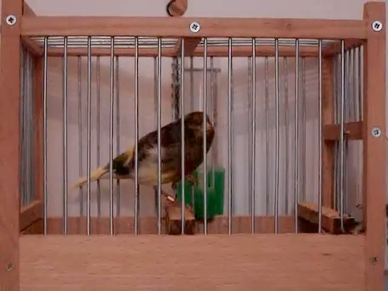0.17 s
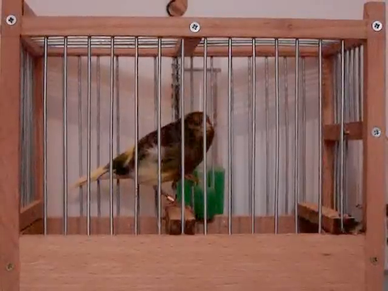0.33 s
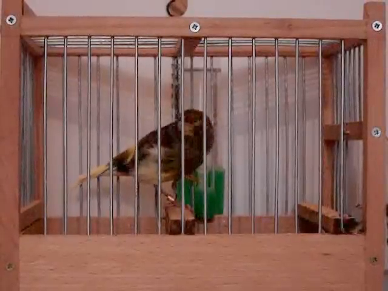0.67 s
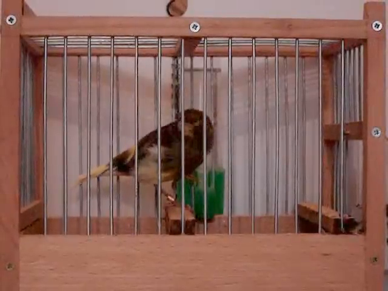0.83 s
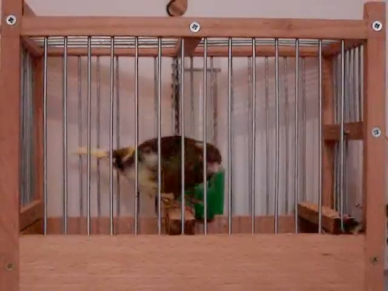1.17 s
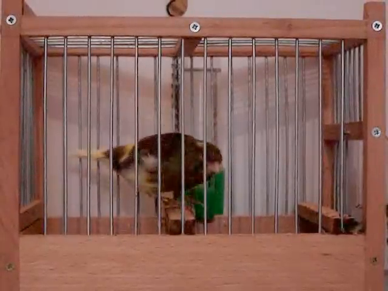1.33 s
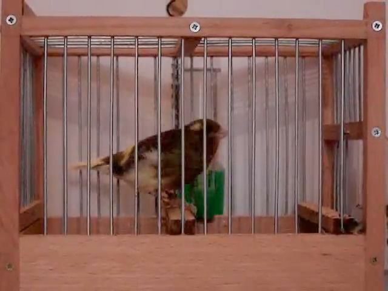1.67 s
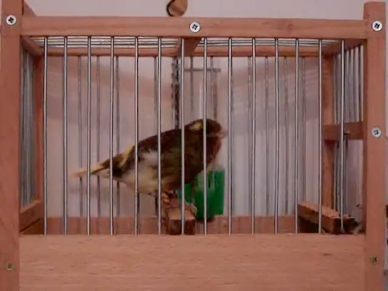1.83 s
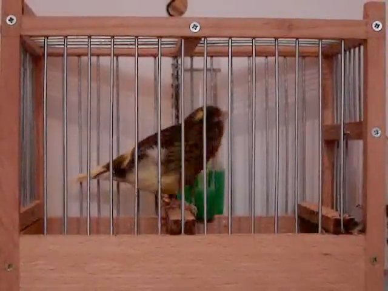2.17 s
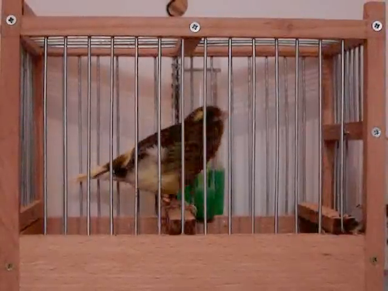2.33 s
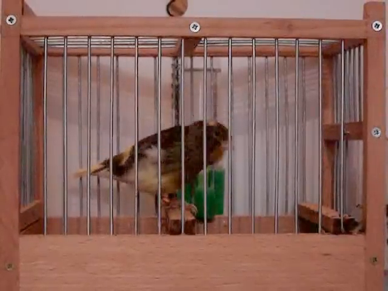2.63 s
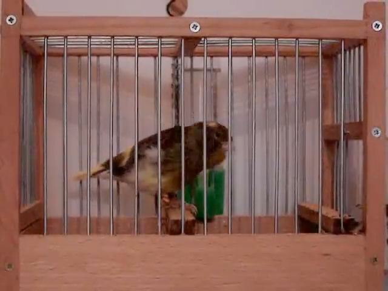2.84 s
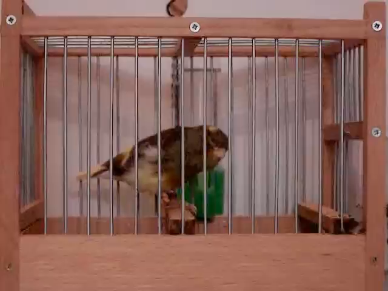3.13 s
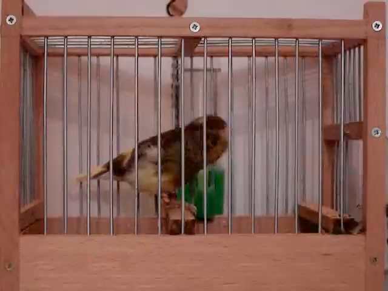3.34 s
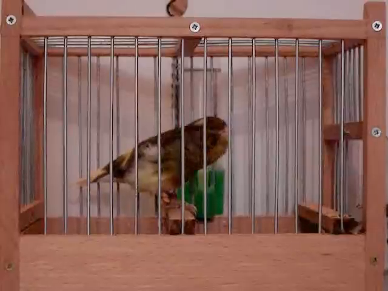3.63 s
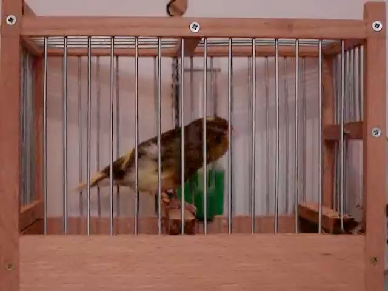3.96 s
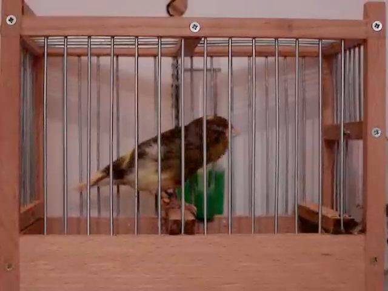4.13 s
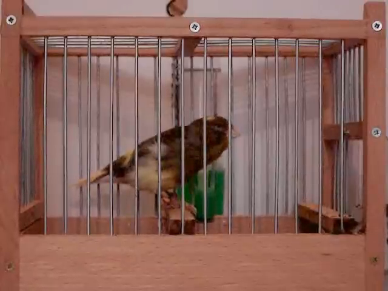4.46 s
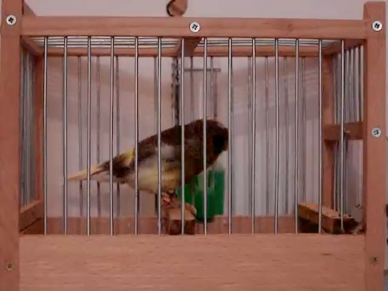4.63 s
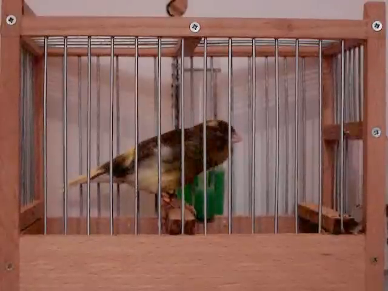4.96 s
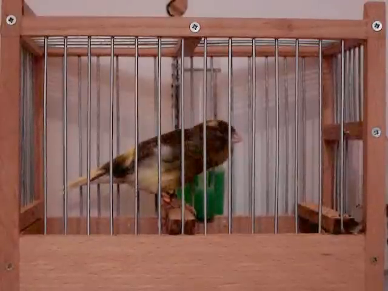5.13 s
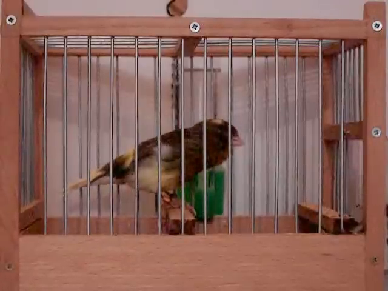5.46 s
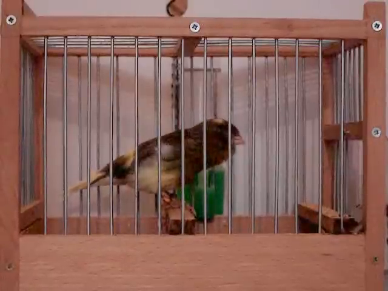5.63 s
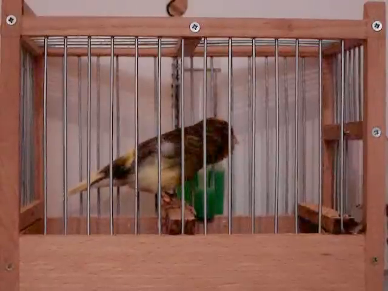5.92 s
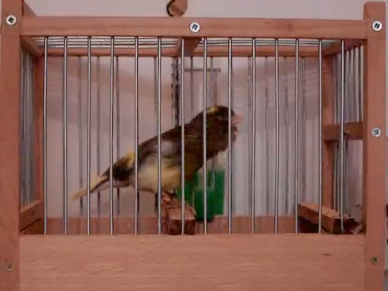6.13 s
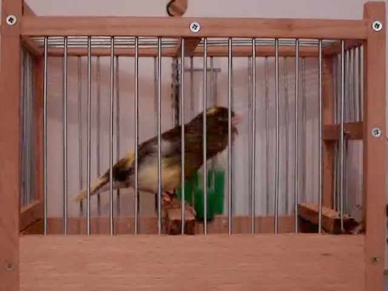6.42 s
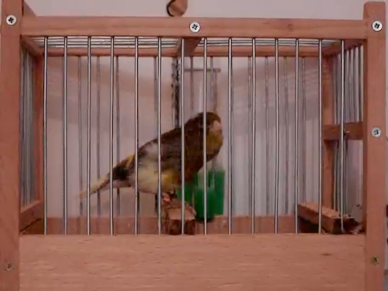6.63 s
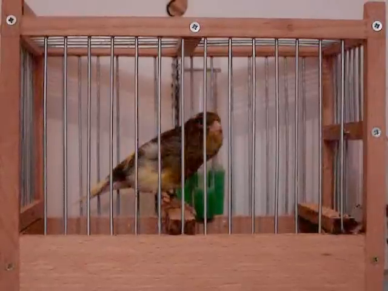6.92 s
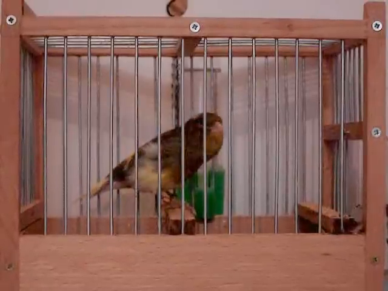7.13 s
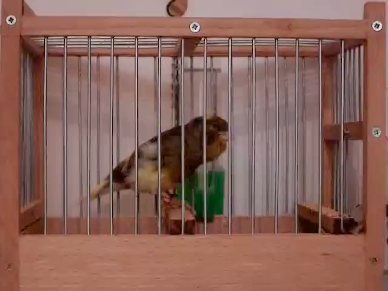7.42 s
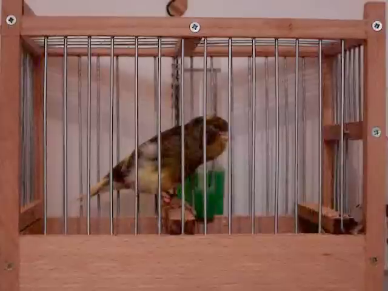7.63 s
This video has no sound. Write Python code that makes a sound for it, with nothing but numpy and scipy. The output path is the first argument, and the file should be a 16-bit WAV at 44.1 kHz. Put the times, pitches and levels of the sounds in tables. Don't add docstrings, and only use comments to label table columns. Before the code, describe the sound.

A single canary sings close to a small microphone in a hard, lively room with faint hiss and low rumble. After a quiet second come a low cluck, dropping notes and soft held whistles, with another bird buzzing faintly. Six sharp chips follow, then a fast ticking trill that rises, then regular double chips to the end.

```python
import sys
import numpy as np
from scipy import signal
from scipy.fft import rfft, irfft
from scipy.io import wavfile
from scipy.ndimage import uniform_filter1d

SR = 44100
rng = np.random.default_rng(int(sys.argv[2]) if len(sys.argv) > 2 else 0)


def generate_wav(signal):
    frames = np.transpose(np.atleast_2d(signal))
    scaled = np.clip(frames, -1, 1) * 32767
    pcm = np.round(scaled).astype(np.int16)
    wavfile.write(sys.argv[1], SR, pcm)


def boost_factor(decibels):
    exponent = np.asarray(decibels, float) / 20
    return 10 ** exponent


N = 343539
EDGE_HZ = 10280


def evened(x):
    return x / np.sqrt(np.mean(x ** 2) + 1e-20)


def read(points, hz):
    f, value = np.transpose(points)
    return np.interp(np.log(hz + 1), np.log(f + 1), value)


def add(mix, s, sound):
    part = mix[round(s * SR):][:len(sound)]
    part += sound[:len(part)]


def band(x, lo_hz, hi_hz):
    return signal.sosfilt(signal.butter(2, [lo_hz, hi_hz], "band", fs=SR, output="sos"), x)


def coloured(count, points):
    spectrum = rfft(rng.standard_normal(count))
    return irfft(spectrum * boost_factor(read(points, np.fft.rfftfreq(count, 1 / SR))), count)


def wander(count, s):
    size = int(s * SR)
    return evened(uniform_filter1d(uniform_filter1d(rng.standard_normal(count), size), size))


def stages(shape, length_s):
    share, *columns = np.transpose(shape)
    u = np.arange(0, 1, 1 / (length_s * SR))
    return [np.interp(u, share, column) for column in columns]


def narrowed(shape, sweep):
    return [(u, 1 + sweep * (factor - 1), *levels) for u, factor, *levels in shape]


# pitch_hz, level_db
THROAT = [(800, 10), (2600, 2), (3600, -6), (4400, 2.5), (5200, -3), (6200, -2), (7500, -8.5), (10000, -11)]


def syrinx(hz, level_db, tones_db, lift_db, flicker_db):
    count = len(hz)
    phase = 2 * np.pi * (np.cumsum(hz) / SR + rng.random())
    voice = np.sin(phase)
    for k, db in enumerate(tones_db, 2):
        flicker = flicker_db * wander(count + 800, 0.003)[400:-400]
        tone_db = db + lift_db + read(THROAT, k * hz) + flicker
        voice = voice + boost_factor(tone_db) * np.sin(k * phase) * (k * hz < EDGE_HZ)
    ramp = np.arange(count)
    edge = np.minimum(ramp, ramp[::-1]) / (0.0009 * SR)
    return boost_factor(level_db) * voice * np.clip(edge, 0, 1)


# time_s, overtone_lift_db
BEAK = [(1.4, -1), (2.8, -0.4), (3.3, 5.5), (3.65, 0.5), (4.3, 1.4), (5.0, 6), (5.5, -2.5), (5.8, 2),
        (6.55, 1), (7.03, -3), (7.6, -3.5)]
# pitch_hz, level_db per Hz
BREATH = [(900, -12), (1500, -8), (3000, 5), (4500, -1.5), (6500, -11.5), (9500, -15)]


def notes(rows, shape, tones_db, dip=(0, 0)):
    out = np.zeros(N)
    dip_share, dip_db = dip
    for s, db, hz, length_s in rows:
        factor, shape_db, lift_db = stages(shape, length_s)
        t = np.arange(len(factor)) / SR - dip_share * length_s
        shape_db = shape_db + dip_db * np.exp(-(t / 0.00088) ** 2)
        beak_db = np.interp(s, *np.transpose(BEAK))
        breath_db = db + shape_db + lift_db - 22.5 - 0.4 * beak_db
        rush = evened(coloured(4096, BREATH))[:len(factor)] * boost_factor(breath_db)
        voice = syrinx(hz * factor, db + shape_db, tones_db, lift_db + beak_db, 3.5)
        add(out, s, voice + rush * np.hanning(len(factor)) ** 0.34)
    return out


def held(rows, shape, tones_db):
    out = np.zeros(N)
    for s, db, hz, length_s in rows:
        factor, shape_db, lift_db = stages(shape, length_s)
        hz = hz * factor * (1 + 0.013 * wander(len(factor), 0.0016))
        lift_db = lift_db + 2.5 * wander(len(hz), .012)
        add(out, s, syrinx(hz, db + shape_db, tones_db, lift_db, 2.1))
    return out


# pitch_hz, level_db per Hz
HISS = [(290, -6.5), (357, -7), (386, -11.5), (804, -14.5), (1260, -16.5), (2900, -20), (7860, -21),
        (10500, -32)]
# half_width_hz, level_db
WHINE = (30, -70.5)
# pitch_hz, level_db per Hz
LOW = [(12, -61), (20, -19), (119, -9.5), (185, -2.5), (223, -5), (300, -7.5)]
# time_s, level_db, half_width_s
SWELLS = [(2.1, 0.5, 0.92), (3.1, 8.5, 0.17), (3.65, 2.5, 0.45), (5.2, 5, 0.33), (7.75, 5, 0.33)]


def air():
    t = np.arange(N) / SR
    hz = np.fft.rfftfreq(N, 1 / SR)
    hiss = evened(irfft(rfft(coloured(N, HISS)) * (hz > 300) * (hz < EDGE_HZ), N))
    low = evened(irfft(rfft(coloured(N, LOW)) * (hz <= 300), N))
    width_hz, whine_db = WHINE
    whine = evened(band(rng.standard_normal(N), 7850 - width_hz, 7850 + width_hz))
    swell_db = sum(db * np.exp(-((t - s) / half_s) ** 2) for s, db, half_s in SWELLS)
    return boost_factor(-53) * hiss + boost_factor(whine_db) * whine + boost_factor(-60.5 + swell_db) * low


# start_s, level_db, length_s
RUSTLES = [(.37, -52, .06), (1.345, -56, .05), (2.372, -54, .03)]


def rustles():
    out = np.zeros(N)
    for s, db, length_s in RUSTLES:
        u = np.arange(0, 1, 1 / (length_s * SR))
        brush = evened(band(rng.standard_normal(len(u)), 830, 5100))
        add(out, s, boost_factor(db) * brush * np.sqrt(u) * (1 - u) * 1.8)
    return out


# start_s, level_db, pitch_hz, length_s
CLUCKS = [
    (1.2414, -18.5, 1056, 0.0071),
    (1.355, -30, 1080, 0.0044),
    (1.593, -31, 1003, 0.0072),
]
# length_share, pitch_factor, level_db, overtone_lift_db
CLUCK_SHAPE = [(0, 1.1, 1.5, 4.5), (.4, 1.001, 0, -5), (1, .9, -13, 1)]
SOFT_SHAPE = [(0, .9, -14, 0), (.3, 1, -2, 0), (.75, 1, 0, 0), (1, 1.01, -14, 0)]
CLUCK_TONES_DB = [-20, -38, -40, -44]
SOFT_TONES_DB = [-15.5, -33.5, -36, -42]
# pitch_hz, level_db under it, length_s
CLUCK_RING = (3780, -18, .005)


def clucks():
    hz, under_db, length_s = CLUCK_RING
    rings = [(s, db + under_db, hz, length_s) for s, db, *_ in CLUCKS]
    return notes(CLUCKS, CLUCK_SHAPE, CLUCK_TONES_DB) + notes(rings, SOFT_SHAPE, SOFT_TONES_DB)


AFTER_SHAPE = [(0, 0.92, -12, -0.45), (.35, 0.981, 0, -0.54), (.75, 1.03, 1.5, -.5), (1, 1.05, -6, -0.54)]


def after(rows, follow, db):
    delay_s, under_db, hz, length_s = follow
    trail = [(s + delay_s, peak_db + under_db, hz * rng.normal(1, .025), length_s)
             for s, peak_db, *_ in rows]
    return boost_factor(db) * notes(trail, AFTER_SHAPE, SOFT_TONES_DB)


# start_s, level_db, pitch_hz, length_s
DROPS = [(1.388, -23.5, 1741, 0.05), (1.935, -20.5, 1668, 0.046), (2.798, -23, 1782, .054),
         (3.018, -18.5, 1845, 0.036)]
DROP_SHAPE = [
    (0, .84, -25.5, -6.5),
    (.33, 0.99, -3, -6),
    (.6, 1.001, -3, 0),
    (.82, .99, 8, -2.5),
    (1, 0.566, -16.5, 3),
]
DROP_TONES_DB = [-11, -17.5, -27.5, -25]
# length_share, depth_db
DROP_DIP = (.8, -7.5)
# delay_s, level_db under the note, pitch_hz, length_s
AFTER_DROP = (.05, -22, 1010, .035)


def drops():
    return notes(DROPS, DROP_SHAPE, DROP_TONES_DB, DROP_DIP), after(DROPS[1:], AFTER_DROP, -1.0)


# start_s, level_db, pitch_hz, length_s
HELD = [(1.552, -28.5, 1403, 0.19), (2.12, -28, 1397, 0.2), (3.172, -28, 1406, .198)]
HELD_SHAPE = [(0, 1.01, -17, .3), (.1, 1.012, -4, .3), (0.549, 1.001, -0.3, .3), (.9, .975, -5.5, .3),
              (1, 0.948, -16, 0.26)]
HELD_TONES_DB = [-18, -16.5, -22.5, -23]


def held_whistles():
    return held(HELD, HELD_SHAPE, HELD_TONES_DB)


# start_s, level_db, pitch_hz, length_s
NEIGHBOUR = [(2.31, -52.5, 3310, 0.055), (2.44, -59, 3266, 0.029), (2.27, -47, 3067, 0.042),
             (2.305, -35.5, 1592, 0.04), (2.37, -45, 1662, 0.049), (4.836, -45, 3730, 0.0072)]
# time_s, pitch_hz, level_db
NEIGHBOUR_BUZZ = [(2.112, 3320, -47), (2.14, 3130, -36), (2.19, 2760, -48), (2.23, 2760, -46)]
LOW_BUZZ = [(2.12, 1950, -47), (2.2, 1890, -47), (2.4, 1810, -46)]
TICK_SHAPE = [(0, .757, -14, 0), (.35, .88, 0, 0), (.65, 1.1, -4, 0), (1, 1.3, -15, 0)]
TICK_TONES_DB = [-20, -26, -35, -33]


def neighbour():
    out = notes(NEIGHBOUR, SOFT_SHAPE, SOFT_TONES_DB)
    for buzz in (NEIGHBOUR_BUZZ, LOW_BUZZ):
        s, hz, db = np.transpose(buzz)
        at = np.arange(s[0], s[-1], .011)
        rows = zip(at, np.interp(at, s, db), np.interp(at, s, hz), np.full(len(at), .006))
        out += notes(rows, narrowed(TICK_SHAPE, 0.86), TICK_TONES_DB)
    return out


# start_s, level_db, pitch_hz, length_s
CHIPS = [(3.4595, -15, 2266, 0.024), (3.592, -11.5, 2540, 0.021), (3.778, -12.5, 2397, 0.019),
         (3.911, -10.5, 2566, 0.02), (4.14, -12, 2494, .022), (4.281, -11.5, 2565, 0.019)]
CHIP_SHAPE = [
    (0, 1.05, -0.5, -5),
    (0.249, .95, -3.5, 3),
    (0.751, .6, -6, 1),
    (1, 0.43, -28, -7),
]
CHIP_TONES_DB = [-17, -23, -22.5, -36]
CHIP_DIP = (0.25, -4)
AFTER_CHIP = (.051, -15, 1120, .025)


def chips():
    return notes(CHIPS, CHIP_SHAPE, CHIP_TONES_DB, CHIP_DIP), after(CHIPS, AFTER_CHIP, -8.5)


# start_s, level_db, pitch_hz, length_s
PICKUP = [(4.894, -28, 1674, 0.0049), (4.9128, -26, 1770, 0.0057)]
# time_s, pitch_hz, effort_db
TRILL = [(4.962, 2063, -22.5), (5.164, 2104, -21.5), (5.28, 2210, -21), (5.337, 2670, -22),
         (5.414, 3230, -18), (5.522, 3536, -17), (5.647, 3530, -15), (5.689, 3570, -23)]
# first_tick_s, tick_count, gap_s
TEMPO = [(4.9572, 15, .01515), (5.1836, 8, .0133), (5.2877, 7, .0117), (5.3706, 3, .0134),
         (5.4135, 12, .016), (5.6045, 6, .015)]
# pitch_hz, length_s, level_db
RATTLE = [(3540, 0.0056, -3.5), (4380, 0.0036, 0.5), (5850, 0.0064, 0.5), (8550, 0.0042, -8.5)]
# low_register_db, high_register_db
LOWER_RATTLE_DB = (-12.5, -28)
UPPER_RATTLE_DB = (-28.5, -30)


def trill():
    ticks = notes(PICKUP, SOFT_SHAPE, TICK_TONES_DB)
    rattle = np.zeros(N)
    at, course_hz, effort_db = np.transpose(TRILL)
    flip_hz = 2880
    beats = [(first_s + k * gap_s, gap_s) for first_s, count, gap_s in TEMPO for k in range(count)]
    for s, gap_s in beats:
        hz = np.interp(s, at, course_hz)
        db = np.interp(s, at, effort_db) + 1.5 * rng.standard_normal()
        s = s + rng.normal(0, .0006)
        high = 1 / (1 + np.exp((flip_hz - hz) / 180))
        shape = narrowed(TICK_SHAPE, 1.42 + (0.39 - 1.42) * high)
        tick_s = gap_s - .0088
        ticks += notes([(s, db, hz * rng.normal(1, .015), tick_s)], shape, TICK_TONES_DB)
        strain_db = 11 * np.exp(-((hz - flip_hz) / 630) ** 2)
        rattle_db = [a + (b - a) * high + strain_db for a, b in (LOWER_RATTLE_DB, UPPER_RATTLE_DB)]
        for (ring_hz, ring_s, ring_db), under_db in zip(RATTLE, np.repeat(rattle_db, 2)):
            t = np.arange(0, ring_s, 1 / SR)
            swell = np.sin(np.pi * t / ring_s) ** 2
            ring = swell * np.sin(2 * np.pi * ring_hz * rng.normal(1, .045) * t)
            add(rattle, s + 0.0013, boost_factor(db + under_db + ring_db + 1.9 * rng.standard_normal()) * ring)
    return ticks, rattle


# start_s, level_db, pitch_hz, second_level_db, second_pitch_hz
PAIRS = [(5.759, -16, 2121, -16.5, 2092), (6.0037, -15, 2103, -15, 2082), (6.262, -15, 2118, -16, 2128),
         (6.5322, -16.5, 2040, -15, 2123), (6.78, -15, 1900, -14.5, 2134),
         (7.0272, -14.5, 2008, -16.5, 2062), (7.286, -13.5, 1995, -14.5, 2055),
         (7.5426, -13, 2100, -12.5, 2127)]
PAIR_SHAPE = [(0, 1.05, -5.5, -4.5), (.3, .99, -0.2, 3.5), (0.622, .8, -1.5, -4), (1, 0.427, -23, 10)]
ANSWER_SHAPE = [(0, 1.03, -5, -9.5), (.3, 1.001, -1, 3.5), (.65, .84, -5.5, 2.5), (1, 0.525, -25.5, -5)]
PAIR_TONES_DB = [-22, -19.5, -26, -53]
PAIR_DIP = (0.472, -5.5)
ANSWER_DIP = (0.39, -5.5)
AFTER_ANSWER = (.017, -19, 920, .015)


def pairs():
    firsts = [(s, db, hz, .021) for s, db, hz, *_ in PAIRS]
    answers = [(s + .0517, db, hz, .019) for s, _, _, db, hz in PAIRS]
    out = notes(firsts, PAIR_SHAPE, PAIR_TONES_DB, PAIR_DIP)
    out += notes(answers, ANSWER_SHAPE, PAIR_TONES_DB, ANSWER_DIP)
    return out, after(answers, AFTER_ANSWER, -3)


# start_s, level_db, pitch_hz, length_s
LAST = [
    (7.724, -32, 1110, 0.0186),
    (7.744, -22, 1078, 0.039),
    (7.777, -21.5, 1060, .016),
]
LAST_SHAPE = [(0, .96, -8, .3), (.3, .99, -12.5, .3), (.65, 1.001, 1, .3), (1, 1.076, -20, 0.302)]
LAST_TONES_DB = [-24, -32, -36, -40]


def closing_note():
    return held(LAST, LAST_SHAPE, LAST_TONES_DB)


# pitch_hz, t60_s
ROOM = [(300, 0.5), (1000, 0.37), (2000, 0.34), (3500, 0.45), (6000, 0.37), (10000, 0.33)]
# pitch_hz, level_db
WALLS = [(600, 0.5), (1200, -8), (1700, -8.5), (3000, 1.5), (4000, -7.5), (5500, -11), (7000, -8),
         (10000, -8)]


def room(x, echoes, tail_db, ring, direct_db=0):
    ring_hz, width_hz, ring_db, linger = ring
    taps = np.zeros(SR)
    at = np.arange(200, SR - 30, 30)
    taps[at + rng.integers(0, 30, len(at))] = rng.choice([-1., 1.], len(at))
    hz, t, z = signal.stft(taps, SR, nperseg=512)
    t60 = read(ROOM, hz) * (1 + abs(linger) / (1 + (2 * (hz - ring_hz) / width_hz) ** 2))
    tail = signal.istft(z * boost_factor(-60 * t / t60[:, None]), SR, nperseg=512)[1]
    tail = boost_factor(tail_db) * tail / np.linalg.norm(band(tail, 1891, 2188)) * np.sqrt(1500 * 2 / SR)
    for s, db in echoes:
        tail[round(s * SR)] += boost_factor(db)
    hz = np.fft.rfftfreq(len(tail), 1 / SR)
    colour_db = read(WALLS, hz) + ring_db / (1 + (2 * (hz - ring_hz) / width_hz) ** 2)
    reflections = irfft(rfft(tail) * boost_factor(colour_db), len(tail))
    return boost_factor(direct_db) * x + signal.fftconvolve(x, reflections)[:N]


# delay_s, level_db
BARS = [(.0013, -20.5), (.0034, -28)]
# delay_s, level_db
ECHOES_FACING = [(.009, -13.5), (0.0133, -10), (0.019, -4.5), (0.034, -7.5), (.042, -7.5), (.058, -10.5)]
ECHOES_TURNED = [(.0085, -11.5), (.014, -15.5), (.022, -14.5), (.031, -9.5), (.046, -14), (.052, -10)]
# pitch_hz, width_hz, level_db, extra share of ring time
RING_OPENING = (1700, 540, 1.7, 0.2)
RING_FACING = (2190, 182, 7.3, 0.22)
RING_TURNED = (1993, 120, 6.7, 0.11)


def scene():
    drop, drop_soft = drops()
    chip, chip_soft = chips()
    ticks, rattle = trill()
    pair, pair_soft = pairs()
    mix = air() + room(neighbour() + rustles(), [], 0.95, RING_OPENING, 4.2)
    mix += room(drop + clucks(), BARS + ECHOES_TURNED[:3], -7.5, RING_OPENING)
    mix += room(held_whistles() + closing_note(), [], -7.5, RING_OPENING)
    mix += room(drop_soft + chip_soft + pair_soft, [], -5.5, RING_OPENING)
    mix += room(chip, BARS + ECHOES_FACING, -5.0, RING_FACING)
    mix += room(ticks, ECHOES_FACING[:1], -2.5, RING_OPENING)
    mix += room(rattle, [], -7.5, (1700, 600, 1.5, .1))
    pose = np.searchsorted([6.2, 6.7, 7.2], np.arange(N) / SR)
    for k in range(4):
        mix += room(pair * (pose == k), BARS + ECHOES_TURNED, -2.2, RING_TURNED)
    return mix[None]


def top_cut(x):
    return signal.sosfilt(signal.butter(12, 10630, fs=SR, output="sos"), x)


# start_s, end_s, depth_db
DROPOUTS = [(3.437, 3.461, -7.5), (3.584, 3.593, -12.5), (4.12, 4.136, -30), (5.992, 5.999, -22),
            (6.243, 6.258, -31), (6.749, 6.762, -7), (3.758, 3.781, -5.5), (7.005, 7.019, -6),
            (7.265, 7.276, -2)]


def record(dry):
    dry = signal.sosfilt(signal.butter(2, 40, "high", fs=SR, output="sos"), dry)
    depth_db = np.zeros(N)
    t = np.arange(N) / SR
    for start_s, end_s, db in DROPOUTS:
        depth_db[(t > start_s) & (t < end_s)] = db
    bass = signal.oaconvolve(dry, signal.firwin(255, 1250, fs=SR)[None], "same")
    gated = bass + (dry - bass) * uniform_filter1d(boost_factor(depth_db), 60)
    band_limit = signal.firwin(511, EDGE_HZ, window=("kaiser", 9), fs=SR)
    limited = signal.oaconvolve(gated, band_limit[None], "same")
    return top_cut(limited)


dry = scene()
out = record(dry)
generate_wav(out)
```